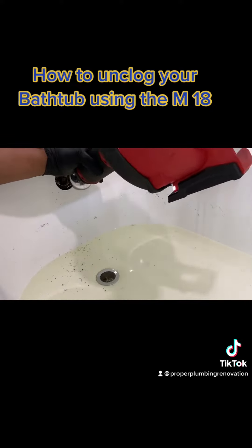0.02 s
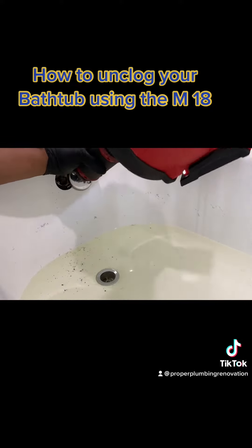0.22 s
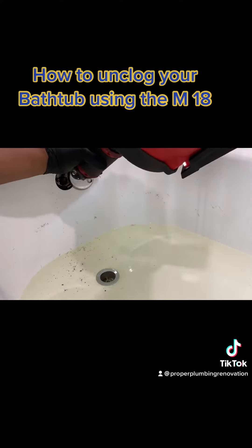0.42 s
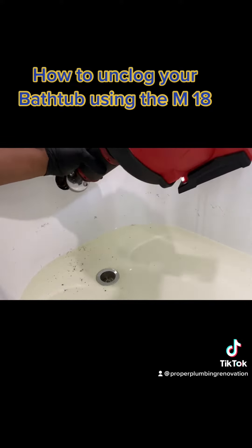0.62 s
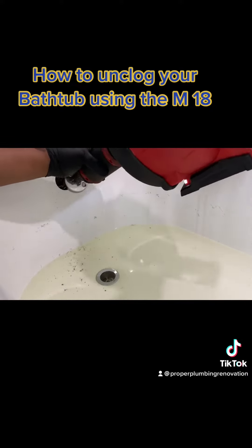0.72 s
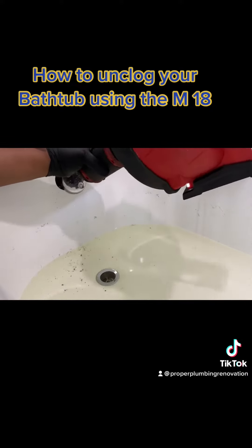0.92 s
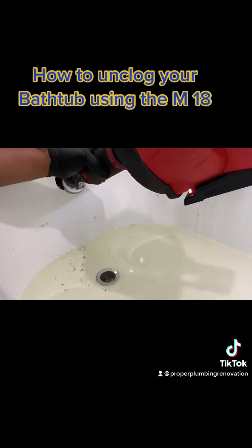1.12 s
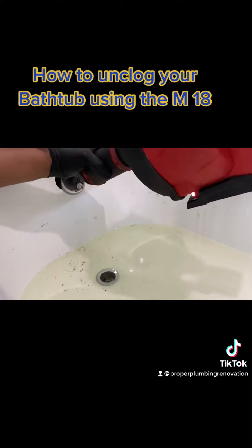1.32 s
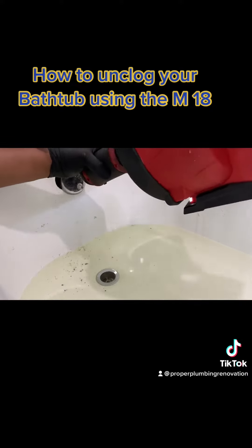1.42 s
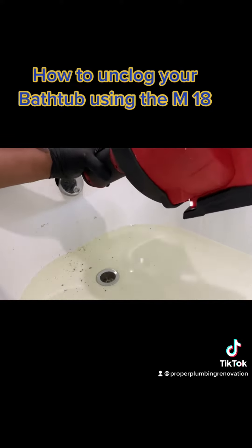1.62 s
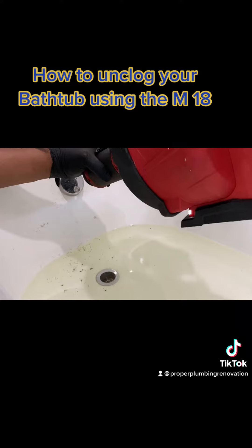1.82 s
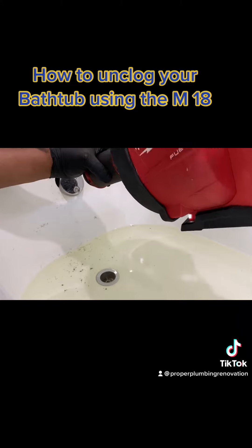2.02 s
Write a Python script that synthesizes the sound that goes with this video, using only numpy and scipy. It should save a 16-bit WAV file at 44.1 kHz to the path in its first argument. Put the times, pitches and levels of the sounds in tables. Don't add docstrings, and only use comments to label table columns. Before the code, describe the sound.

A cordless drain cleaning machine, heard close in a tiled bathroom: faint knocks at first, then from 0.2 seconds the motor revs quickly, with hard cable cracks and short squeals at 0.3-0.5. It runs roughly, the coil rasping and rattling, with irregular slaps and hollow tub booms, stronger near 1.15 and 1.55. From 1.7 it winds down, a last knock at 1.8, leaving short ringing and quiet by 2.

```python
import sys
import numpy as np
from scipy import signal
from scipy.fft import rfft, irfft
from scipy.io import wavfile
from scipy.ndimage import uniform_filter1d

SR = 44100
rng = np.random.default_rng(int(sys.argv[2]) if len(sys.argv) > 2 else 0)


def level_to_linear(level):
    exponent = np.asarray(level, float) / 20
    return 10 ** exponent


def dump_mix(stems):
    frames = np.atleast_2d(stems).T
    limited = np.clip(frames, -1, 1)
    pcm = np.round(limited * 32767).astype(np.int16)
    wavfile.write(sys.argv[1], SR, pcm)


N = 92610

# [t/s, shaft f/Hz, drag level/dB, whine level/dB]
MOTOR_RUN = [(0, 88.8, -41, -56), (0.143, 98, -66, -55), (0.146, 100.4, -39, -66), (0.248, 165, -29.5, -64),
             (0.359, 240.1, -22.5, -33), (0.39, 271.9, -21.5, -21.5), (0.469, 327, -28, -23.5),
             (0.528, 338.4, -33, -55), (0.699, 314.4, -32.5, -37), (0.898, 310.3, -30, -42),
             (1.02, 311.7, -31.5, -34), (1.141, 318.7, -30, -29), (1.199, 313.6, -28, -47),
             (1.32, 308, -30.5, -29.5), (1.451, 306.7, -35.5, -75), (1.7, 295, -37, -33),
             (1.83, 246, -41.5, -49.5), (1.95, 211, -69.5, -94)]
# [multiple of shaft speed, level/dB, width/Hz]
SHAFT_ORDERS = [(1, 0, 14), (2.9, -16, 60), (7.8, -16, 90), (8.5, -16, 60)]
# [f/Hz, level/dB per Hz]
DRAG_COLOUR = [(30, -42.5), (100, -12), (200, -5), (420, -13.5), (780, -9), (1750, -17), (2620, -12),
               (11300, -31.5), (16500, -38.5)]
# [t/s, crack level/dB, tub boom over crack/dB, housing ring
# over crack/dB, t60/s]
CABLE_SLAPS = [(0.275, -19.5, -18, 3.5, 0.071), (0.3169, 2.5, -24, -39.5, 0.037),
               (0.3992, 2, -13, -9.5, 0.039), (0.4347, -6.5, -12.5, -9.5, 0.3), (0.4643, -5, -29, -24, 0.1),
               (0.5363, -3, -6.5, -3.5, 0.13), (0.6026, -10.5, 3.5, -7, 0.14),
               (0.6492, -9.5, -1.5, -5.5, 0.13), (0.7196, -15, 7, 3, 0.13), (0.77, -17, 3, -2.5, 0.22),
               (0.8063, -16, 7, -26.5, 0.13), (0.9313, -10, -1, -2.5, 0.14), (1.13, -19, -8, -1.5, 0.12),
               (1.161, -4.5, 1, 0, 0.071), (1.1944, -18, -28, -17, 0.088), (1.279, -14, -9, -21.5, 0.08),
               (1.3382, -8.5, -27.5, -1, 0.12), (1.4892, -16, 1.5, -3.5, 0.21),
               (1.536, -0.5, 0, -5.5, 0.082), (1.6303, -17.5, 2.5, -2.5, 0.25),
               (1.6594, -16, -16.5, -29.5, 0.1), (1.7607, -6, 0, -9, 0.095), (1.806, -28, 16, 11, 0.092),
               (0.0014, -33, 0.5, 7, 0.12), (0.11, -34, -9, 0, 0.045), (0.146, -32, -12, -8, 0.1),
                (0.2171, -29.5, -17, 1, .08), (0.2854, -28, -12, -15, .06), (0.303, -17.5, 10, -17, .06),
                (0.533, -7.5, -17, -5, 0.051), (1.167, -10.5, 10.5, 4.5, 0.043),
                (1.329, -9.5, -13, -13, 0.14), (1.6433, -19, -6, -2, 0.18), (1.547, -11, -4.5, 10, 0.055),
                (0.581, -14.5, -3, -22, 0.14), (0.8935, -26, -5, -10, 0.1), (1.098, -19, 5, -12, 0.052),
                (1.516, -11, -30.5, -4.5, 0.11), (1.7186, -22.5, 11, -18, 0.13),
                (1.746, -17, -12, -2, 0.21), (1.912, -38.5, -10.5, -6.5, 0.07), (2.028, -57, -5, -10, .04),
                (2.087, -45.5, -8, -10.5, 0.2)]
# [f/Hz, level/dB per Hz]
CRACK_COLOUR = [(530, -59.5), (900, -4.5), (5860, -13.5), (6950, -14), (9090, -12.5), (11200, -17.5),
                (13400, -16), (15900, -26.5), (16500, -52.5)]
# [f/Hz, width/Hz, level/dB]
TUB_MODES = [(80, 90, -6), (165, 62, 4), (308, 35, -3)]
# [f/Hz, width/Hz, level/dB]
HOUSING_MODES = [(574, 83, 8.5), (775, 176, 15), (866, 66, -29), (1060, 150, 4.5)]
# [t/s, length/s, from f/Hz, to f/Hz, peak level/dB]
SLIDING_SQUEALS = [(0.15, 0.079, 708, 923, -36.5), (0.117, 0.19, 9700, 10100, -56.5),
                   (0.267, .075, 2500, 2930, -27), (0.31, 0.052, 537, 586, -25), (.34, .048, 630, 750, -23),
                   (.408, .03, 825, 870, -14), (.435, .03, 800, 805, -25), (.36, .03, 240, 250, -24),
                   (0.726, 0.082, 2720, 2630, -38), (0.788, 0.13, 2570, 2500, -37),
                   (1.01, 0.087, 2380, 2320, -35.5), (1.026, 0.053, 2623, 2680, -43),
                   (1.33, 0.064, 841.6, 749, -21.5), (1.397, 0.055, 763, 700, -28.5),
                   (1.199, 0.13, 2360, 2400, -48), (1.33, 0.031, 3515, 3350, -27),
                   (1.538, 0.039, 1052, 1094, -23.5), (1.54, 0.036, 1396, 1390, -22.5),
                   (1.541, 0.025, 1762, 1793, -25), (1.788, 0.059, 958, 915, -30),
                   (2.097, .012, 4900, 4950, -51)]
# [t/s, f/Hz, peak level/dB, t60/s]
PANEL_RINGS = [(.125, 50, -27, .08), (.222, 740, -30, .15), (.308, 235, -14, .11), (.472, 5790, -27, .17),
               (.54, 163, -24, .17), (.6, 165, -18, .16), (.61, 312, -24, .3), (.722, 165, -23, .15),
               (.772, 190, -24, .12), (.808, 172, -21, .25), (.932, 306, -18, .17), (.94, 165, -22, .2),
               (1.095, 165, -21, .15), (1.166, 168, -12, .13), (1.28, 305, -22, .2), (1.308, 300, -21, .2),
               (1.336, 790, -20, .15), (1.488, 170, -23, .12), (1.54, 168, -17, .15), (1.545, 292, -23, .2),
               (1.758, 178, -18, .12), (1.635, 315, -24, .12), (1.715, 300, -26, .15),
               (.455, 165, -24, .15), (1.785, 371, -26, .42), (1.808, 217, -21, .12),
               (1.908, 130, -40, .08), (.925, 90, -24, .12)]
# [f/Hz, t60/s]
ROOM_DECAY = [(100, 0.28), (400, .45), (1500, 0.22), (5000, 0.15), (14000, 0.21)]
# [f/Hz, level/dB per Hz]
HUSH_COLOUR = [(20, 1.5), (300, 2), (1040, -20.5), (2610, -24.5), (9000, -81)]
# [f/Hz, share in common]
PORT_LIKENESS = [(40, 0.27), (80, 0.23), (150, 0.95), (300, 0.41), (700, 0.073), (5500, 0.27), (7000, 0.2)]
# [f/Hz, left over right level/dB]
LEFT_LEAN = [(60, 3.5), (550, 4.5), (5000, 3.5), (7000, 0)]
# [f/Hz, level/dB]
MIC_RESPONSE = [(8700, 0), (9200, 2), (9700, 0), (12600, -4.5), (13000, -11), (13800, -17.5), (14300, -0.5)]
# [f/Hz, level/dB]
GATE_LIMIT = [(7000, -112), (9000, -122), (12000, -82.5), (16000, -71.5)]


def evened(x):
    return x / np.sqrt(np.mean(x ** 2) + 1e-20)


def read(points, hz):
    f, value = np.transpose(points)
    return np.interp(np.log(hz + 1), np.log(f + 1), value)


def coloured(x, points):
    gain = level_to_linear(read(points, np.fft.rfftfreq(N, 1 / SR)))
    return evened(irfft(rfft(x) * gain, N))


def rattle():
    ticks_per_s, spread_db, tick_share = 1600, 2, 0.36
    sizes = level_to_linear(spread_db * np.minimum(rng.exponential(1, (2, N)), 5))
    ticks = sizes * (rng.random((2, N)) < ticks_per_s / SR)
    ticking = evened(ticks * rng.standard_normal((2, N)))
    return tick_share * ticking + (1 - tick_share) * rng.standard_normal((2, N))


def coil_drag(s, hz):
    patch_db, bright_hz_per_hz = 2.2, 55
    f, frames, z = signal.stft(coloured(rattle(), DRAG_COLOUR), SR, nperseg=512)
    edge_hz = bright_hz_per_hz * np.interp(frames, s, np.maximum.accumulate(hz))
    patches = uniform_filter1d(rng.standard_normal(z.shape[1:]), size=2, axis=0)
    patches = evened(uniform_filter1d(patches, size=7, axis=1))
    z = z * level_to_linear(patch_db * patches) / (1 + (f[:, None] / edge_hz) ** 2)
    return signal.istft(z, SR, nperseg=512)[1][:, :N]


def motor():
    s, hz, drag_db, whine_db = np.transpose(MOTOR_RUN)
    t = np.arange(N) / SR
    angle = 2 * np.pi * np.cumsum(np.interp(t, s, hz)) / SR
    whine = 0
    for multiple, db, width in SHAFT_ORDERS:
        drift = np.cumsum(rng.standard_normal(N))
        whine = whine + level_to_linear(db) * np.sin(multiple * angle + np.sqrt(2 * np.pi * width / SR) * drift)
    flutter = level_to_linear(0.8 * evened(uniform_filter1d(rng.standard_normal(N), 500)))
    drag = coil_drag(s, hz)
    return flutter * (level_to_linear(np.interp(t, s, whine_db)) * whine + level_to_linear(np.interp(t, s, drag_db)) * drag)


def blows(column, rise_s, longer):
    rows = np.array(CABLE_SLAPS)
    since = np.maximum(np.arange(N) / SR - rows[:, :1], 0)
    level_db = rows[:, 1:2] + (rows[:, column:column + 1] if column else 0)
    rise = (1 - np.exp(-since / rise_s)) ** 2
    shape = rise * level_to_linear(level_db - 60 * since / (longer * rows[:, 4:]))
    return np.sqrt((shape ** 2).sum(0))


def resonate(x, hz, width):
    turn = np.exp(2j * np.pi * np.cumsum(hz * np.ones(N)) / SR)
    r = np.exp(-np.pi * width / SR)
    return 2 * (turn * signal.lfilter([1 - r], [1, -r], x / turn + 1e-18)).real


def body(force, modes):
    push = force * rng.standard_normal((2, N))
    unit = np.sqrt(sum(level_to_linear(2 * db) for _, _, db in modes))
    out = np.zeros((2, N))
    for hz, width, db in modes:
        equal_power = np.sqrt(SR / (2 * np.pi * width))
        out += level_to_linear(db) * equal_power * resonate(push, hz, width)
    return out / unit


def cable():
    crack = coloured(rattle(), [(300, -55.0)] + CRACK_COLOUR) * blows(column=0, rise_s=0.003, longer=1)
    ring = body(blows(column=3, rise_s=0.003, longer=0.63), HOUSING_MODES)
    boom = body(blows(column=2, rise_s=0.005, longer=0.9), TUB_MODES)
    return level_to_linear(-8) * crack + level_to_linear(-2) * ring + level_to_linear(-7) * boom


def squeals():
    blur = 0.00625
    out, wander = np.zeros((2, N)), np.cumsum(rng.standard_normal((2, N)), axis=1)
    for s, length, from_hz, to_hz, db in SLIDING_SQUEALS:
        at = slice(round(s * SR), min(round((s + length) * SR), N))
        u = np.linspace(0, 1, at.stop - at.start)
        hz = from_hz + (to_hz - from_hz) * u
        unsteady = np.sqrt(2 * np.pi * blur * to_hz / SR) * wander[:, at]
        angle = 2 * np.pi * np.cumsum(hz) / SR + unsteady
        out[:, at] += level_to_linear(db) * np.sin(np.pi * u ** 0.67) * np.sin(angle)
    return out


def rings():
    rise_turns, waver, waver_hz = 1.2, 0.012, 10.0
    out = np.zeros((2, N))
    for s, hz, db, t60 in PANEL_RINGS:
        waver_phase, side_phase = rng.uniform(0, 2 * np.pi, 2)
        start = round(s * SR)
        t = np.arange(min(round(t60 * SR), N - start)) / SR
        pitch = hz * (1 + waver * np.sin(2 * np.pi * waver_hz * t + waver_phase))
        angle = 2 * np.pi * np.cumsum(pitch) / SR + [[0], [side_phase / 6]]
        swell = 1 - np.exp(-t / (0.00067 + rise_turns / hz))
        out[:, start:start + len(t)] += swell * level_to_linear(db - 60 * t / t60) * np.sin(angle)
    return out


def room(x):
    size = SR // 2
    taps = rng.choice([-1., 1.], (2, size)) * (rng.random((2, size)) < 0.05)
    taps = taps * (np.arange(size) > 200)
    hz, t, z = signal.stft(taps, SR, nperseg=256)
    decay = level_to_linear(-60 * t / read(ROOM_DECAY, hz)[:, None])
    tail = signal.istft(z * decay, SR, nperseg=256)[1]
    return signal.fftconvolve(x, tail / np.linalg.norm(tail[0]), axes=1)[:, :N]


def scene():
    near = motor() + cable()
    panels = squeals() + rings()
    echoes = room(level_to_linear(-7.5) * near + level_to_linear(-14) * panels)
    hush = level_to_linear(-50.5) * coloured(rng.standard_normal((2, N)), HUSH_COLOUR)
    return near + panels + echoes + hush


def gate(pair):
    size, band = 1024, 16
    under_db, jitter_db = -9, 7
    sum_diff = np.array([pair[0] + pair[1], pair[0] - pair[1]]) / 2
    hz, _, z = signal.stft(sum_diff, SR, "cosine", 2 * size, size)
    centre = hz[:size:band, None]
    power = (abs(z[:, :size]) ** 2).reshape(2, size // band, band, -1).mean(axis=2)
    level_db = 10 * np.log10(power + 1e-20)
    limit_db = np.maximum(read(GATE_LIMIT, centre), level_db[::-1] + under_db)
    jittered_db = level_db + jitter_db * rng.standard_normal(level_db.shape)
    keep = (jittered_db > limit_db) | (centre < 6500)
    z[:, :size] *= np.repeat(keep, band, axis=1)
    mid, side = signal.istft(z, SR, "cosine", 2 * size, size)[1][:, :N]
    return np.array([mid + side, mid - side])


def band_limit(x):
    return signal.sosfilt(signal.butter(12, 16870, fs=SR, output="sos"), x)


def record(dry):
    treble_same, lag_from_hz, lag_hz_per_turn = 0.72, 7100, 4200
    edge_hz, ceiling = 15900, 0.9
    hz, (a, b) = np.fft.rfftfreq(N, 1 / SR), rfft(dry)
    same = np.clip(read(PORT_LIKENESS + [(9000, treble_same)], hz), 0, 1)
    lag = np.exp(-2j * np.pi * np.maximum(hz - lag_from_hz, 0) / lag_hz_per_turn)
    lean = level_to_linear(read(LEFT_LEAN, hz) / 2)
    left = a * lean
    right = (same * lag * a + np.sqrt(1 - same ** 2) * b) / lean
    pair = np.array([left, right]) * level_to_linear(read(MIC_RESPONSE, hz)) * (hz < edge_hz)
    limited = ceiling * np.tanh(irfft(pair, N) / ceiling)
    return band_limit(gate(limited))


dry = scene()
out = record(dry)
dump_mix(out)
```